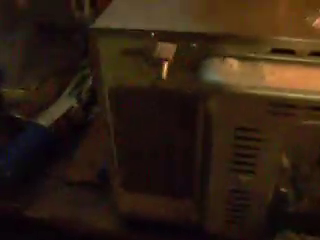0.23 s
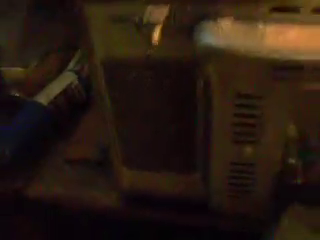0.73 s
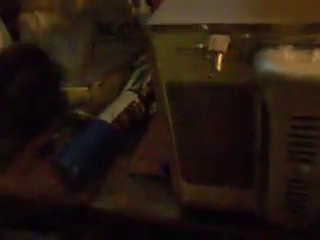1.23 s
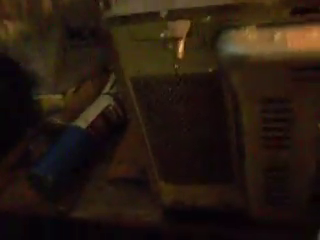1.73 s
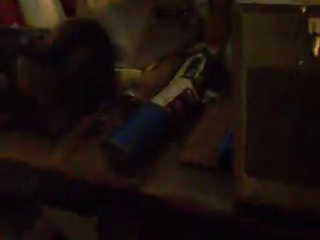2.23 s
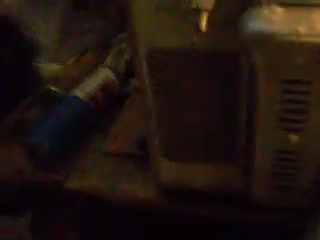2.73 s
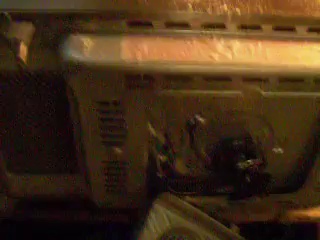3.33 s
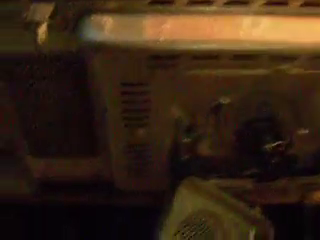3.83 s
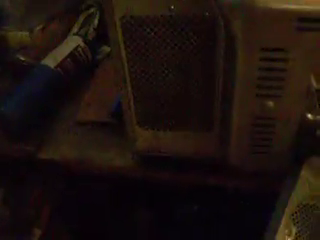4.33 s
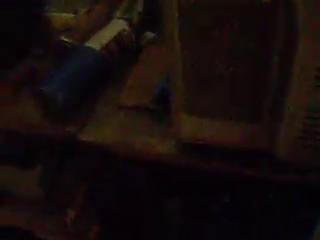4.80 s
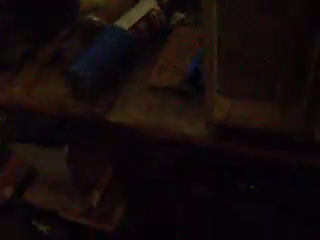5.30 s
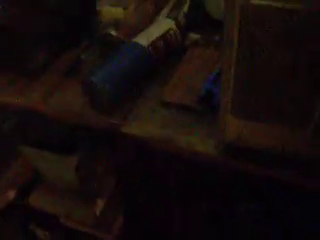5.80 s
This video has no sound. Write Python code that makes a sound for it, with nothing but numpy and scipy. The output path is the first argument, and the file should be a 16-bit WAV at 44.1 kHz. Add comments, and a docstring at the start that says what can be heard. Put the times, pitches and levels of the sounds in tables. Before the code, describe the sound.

A heavy hammer pounds a metal microwave oven on a workshop bench in a steady rhythm, roughly three blows every two seconds. Each hit is a harsh burst of crumpling sheet steel with a short clang and low thump; the case drops back, its loose panels rattle, and hard clinks ring out. The room echoes briefly over soft low background noise. The close, narrow-band microphone distorts and crackles on the blows.

```python
"""A sledgehammer smashes a microwave oven on a workshop bench, blow after blow in a steady rhythm.
Each blow is a shower of tiny contacts that makes the steel case ring, plus a clang and a low bench thump.
The case falls back and its panels rattle (more contacts); hard clinks and faint metal scrapes ring in the room.
Under it lies a soft background of filtered noise. A narrow-band microphone close by is overloaded by the blows."""
import sys
import numpy as np
from scipy import signal
from scipy.fft import rfft, irfft, next_fast_len
from scipy.io import wavfile

SR = 44100
rng = np.random.default_rng(int(sys.argv[2]) if len(sys.argv) > 2 else 0)


def bounce(signal):
    """Save signal as a 16-bit WAV file at the path given by the first command-line argument."""
    frames = np.transpose(np.atleast_2d(signal))
    limited = np.clip(frames, -1, 1)
    pcm = np.round(limited * 32767).astype(np.int16)
    wavfile.write(sys.argv[1], SR, pcm)


N = 266981  # length of the scene in samples

# Hammer blows, the first still dying away at the start: (time [s], energy [dB], crumpling time [s],
# bench thump [dB], fall-back [dB], first rattle [dB])
HAMMER_BLOWS = [(-.047, 34.5, 0.07, 13.5, 32.5, -0.5), (.5950, 43, .044, 22, 28, 8),
                (1.2502, 43, .036, 17.5, 23.5, 6.5), (1.9588, 44, .039, 21, 19.5, 16.5),
                (2.6039, 42.5, 0.061, 19.5, 20.5, 14.5), (3.2270, 42, .049, 23.5, 30, 13),
                (3.923, 42, 0.06, 13, 27.5, 4.5), (4.6469, 45, .028, 24.5, 17, 15.5),
                (5.3391, 41.5, 0.051, 20.5, 9, 10)]
# Single louder knocks as the case tips and the hammer is pulled free:
# (time [s], energy [dB], chatter time [s])
CASE_KNOCKS = [(.028, 29.5, 0.0083), (.878, 21, 0.036), (1.1067, 12, 0.019), (1.150, 12, .02),
               (1.498, 19.5, .016), (2.318, 21, 0.028), (2.466, 13, 0.002), (3.064, 21, 0.019),
               (3.150, 11, .012), (3.505, 19, 0.005), (3.788, 26, 0.0064), (4.3535, 17, .0015),
               (4.597, 4.5, .002), (4.894, 29, 0.01), (5.040, 12.5, 0.052), (5.2560, 27.5, .009),
               (5.9726, 21, 0.018)]
# Hard clinks, and faint metal scrapes as the hammer is pulled out:
# (time [s], energy [dB], chatter time [s], ring pitch [Hz], time to fall 60 dB [s])
METAL_CLINKS_AND_SCRAPES = [(0.417, 22.5, 0.0092, 3430, 0.015), (.424, 21, .032, 4100, 0.0067),
                            (1.063, 5, .035, 2234, .3), (1.902, -3, 0.09, 3200, 0.012),
                            (2.127, 25, 0.031, 3250, 0.033), (2.466, 22, .02, 3200, .03),
                            (3.060, 14.5, 0.0081, 3600, .015), (3.789, 22.5, 0.0059, 3420, 0.02),
                            (4.362, 11.5, 0.0038, 3170, .035), (4.597, -1.5, 0.015, 3210, 0.052),
                            (4.631, 4.5, .008, 3230, .06), (4.826, 20.5, 0.016, 3280, 0.035),
                            (5.257, 15.5, 0.003, 3650, .015), (5.790, 3.5, 0.066, 2700, 0.0061)]
# Long single tones of the steel case:
# (pitch before detuning [Hz], relative energy [dB], time to fall 60 dB [s])
CASE_MODES = [(155.4, -26, 0.93), (185.8, -21, 0.72), (209, -25, 0.98), (279.6, -29.5, 0.98), (409, -21, 1),
              (526.5, -20.5, 1), (595.7, -16, 0.59), (619, -17.5, 1), (668, -23, .6), (735, -30, 0.2),
              (823, -20, 0.78), (1060, -22.5, 0.3), (1340, -25.5, 0.52), (2234, -19.5, 0.36),
              (2806, -24.5, 0.15), (3200, -25, 0.98), (3440, -19, 0.6)]
# Tone colour of the dense ring of the dented panels: (frequency [Hz], relative level per Hz [dB])
PANEL_COLOUR = [(25, -19), (70, -11), (170, 1.5), (320, -2), (400, 0.5), (460, -4), (620, 4.5), (1000, 2),
                (1600, 0), (2600, 0.5), (4000, 4), (6000, -7.5)]
# How long the workshop echoes: (frequency [Hz], time to fall 60 dB [s])
ROOM_DECAY = [(60, 1.79), (170, 1), (400, 1), (900, 0.67), (2000, 0.62), (3400, 0.71), (5000, 0.42)]
# Tone colour of the room's background: (frequency [Hz], relative level per Hz [dB])
AIR_COLOUR = [(20, -1), (50, -5.5), (110, 22.5), (250, -1), (700, -11), (2000, -9.5), (5000, -25)]
# Microphone response, falling steeply above its narrow band: (frequency [Hz], gain [dB])
MIC_RESPONSE = [(20, -5.5), (2900, -1.5), (3150, -0.5), (3450, -0.5), (3720, -3.5), (3950, -21.5),
                (4300, -21), (4550, -28.5), (4900, -91.5)]
# Treble roll-off after the clipping: (frequency [Hz], gain [dB])
TREBLE_ROLLOFF = [(20, 0), (4500, 0), (5200, -2.5), (10300, -5), (12000, -4.3), (16000, -4.3)]

AIR_DB = -54  # background level before the microphone
EDGE_HZ = 16200  # top edge of the finished sound
RING_SIZE = 57344  # length of rings and echoes in samples
# each blow lifts the case, which drops back on the bench a moment later
FALL_BACK_S, FALL_CHATTER_S = .171, .015
# then its loose panels rattle, on average ever more softly
RATTLE_DELAY_S, RATTLE_GAP_S, RATTLE_CHATTER_S = .24, .045, 0.024
RATTLE_FADE_DB_PER_S, RATTLE_SPREAD_DB = 41.5, 4


def gain_of(db):
    """Turns decibels into an amplitude factor."""
    return 10 ** (np.asarray(db) / 20)


def unit(x):
    """Scales a sound to energy 1 (the sum of its squares)."""
    return x / np.sqrt(np.sum(x ** 2) + 1e-20)


def read(points, hz):
    """Reads between the points of a table, on a logarithmic frequency axis."""
    f, value = np.transpose(points)
    return np.interp(np.log(hz + 1), np.log(f + 1), value)


def coloured(x, points):
    """Makes each frequency louder or softer, following a (frequency [Hz], level [dB]) table."""
    size = next_fast_len(len(x) + 2048)
    gain = gain_of(read(points, np.fft.rfftfreq(size, 1 / SR)))
    return irfft(rfft(x, size) * gain, size)[:len(x)]


def dying(t, t60):
    """Amplitude that falls by 60 dB in t60 seconds."""
    return np.exp(-np.log(1000) * t / t60)


def add(mix, s, sound):
    """Adds a sound at time s; what lies outside the mix is lost."""
    start = round(s * SR)
    sound = sound[max(-start, 0):]
    part = mix[max(start, 0):][:len(sound)]
    part += sound[:len(part)]


def chatter(seconds, per_s, first):
    """Force of a contact: one sharp tick, then a dying shower of slips and rebounds, a few of them large."""
    t = np.arange(SR // 3) / SR
    size_db = 5 * np.minimum(rng.exponential(1, len(t)), 3)
    slips = rng.choice([-1, 1], len(t)) * gain_of(size_db)
    happens = rng.random(len(t)) < per_s / SR
    force = unit(slips * happens * np.exp(-t / max(seconds, 1e-3)))
    force[0] += first
    return unit(force)


def room_tail():
    """Dense reflections: noise that swells quickly, then dies at its own speed in each band."""
    hz, t, bands = signal.stft(rng.standard_normal(RING_SIZE), SR, nperseg=512)
    fade = dying(t, read(ROOM_DECAY, hz)[:, None])
    tail = signal.istft(bands * fade, SR, nperseg=512)[1][:RING_SIZE]
    swell = 1 - np.exp(-np.arange(RING_SIZE) / SR / 0.0024)
    return unit(tail * swell)


def case_ring(panel_t60, room_db, modes_db):
    """The case struck at one spot: a brief clash of panels, its long tones, and the room's answer."""
    t = np.arange(RING_SIZE) / SR
    clash = unit(rng.standard_normal(RING_SIZE) * dying(t, panel_t60))
    dense = unit(coloured(clash + gain_of(room_db) * room_tail(), PANEL_COLOUR))
    # dents detune the tones from spot to spot, so that they beat against each other
    detune_hz = 12
    modes = np.zeros(RING_SIZE)
    for hz, db, t60 in CASE_MODES:
        pitch = hz + detune_hz * rng.standard_normal()
        tone = unit(dying(t, t60) * np.sin(2 * np.pi * pitch * t))
        modes += gain_of(db) * tone * rng.choice([-1, 1])
    return dense + gain_of(modes_db) * modes


def shake_case(force, panel_t60, room_db, modes_db, count=3):
    """Every slip of the force lands on one of several spots of the case, each with its own ring."""
    spot = rng.integers(0, count, N)
    out = np.zeros(N)
    for k in range(count):
        ring = case_ring(panel_t60, room_db, modes_db)
        out += signal.oaconvolve(force * (spot == k), ring)[:N]
    return out


def air():
    """Low, steady background of the workshop: noise shaped by its tone colour."""
    return gain_of(AIR_DB) * np.sqrt(N) * unit(coloured(rng.standard_normal(N), AIR_COLOUR))


def clinks_and_scrapes():
    """Showers of contacts excite one main ring and a cluster of short tones nearby; the room carries them on."""
    out, t = np.zeros(N), np.arange(SR // 4) / SR
    for s, db, seconds, hz, t60 in METAL_CLINKS_AND_SCRAPES:
        ring = unit(np.sin(2 * np.pi * hz * t) * dying(t, t60))
        ratios = 1 + 0.14 * rng.standard_normal(16)
        cluster = sum(np.sin(2 * np.pi * hz * ratio * t) for ratio in ratios)
        ring = ring + gain_of(-4) * unit(cluster * dying(t, 0.033))
        contacts = chatter(seconds, per_s=1500, first=0.4)
        add(out, s, gain_of(db) * unit(signal.fftconvolve(contacts, ring)))
    return out + gain_of(-18.5) * signal.oaconvolve(out, room_tail())[:N]


def rocking(fall_db, rattle_db, count=9):
    """Force on the case after a blow: it falls back, then rattles at uneven intervals."""
    force = np.zeros(SR)
    add(force, FALL_BACK_S, gain_of(fall_db) * chatter(FALL_CHATTER_S, per_s=1100, first=.17))
    for k in range(count):
        after = RATTLE_GAP_S * (k + rng.random())
        db = rattle_db - RATTLE_FADE_DB_PER_S * after + RATTLE_SPREAD_DB * rng.standard_normal()
        rattle = chatter(RATTLE_CHATTER_S, per_s=900, first=0.14)
        add(force, RATTLE_DELAY_S + after, gain_of(db) * rattle)
    return force


def knocks():
    """The case falls back and loose panels chatter against it as it rocks, which makes it ring."""
    force = np.zeros(N)
    for s, _, _, _, fall_db, rattle_db in HAMMER_BLOWS:
        add(force, s, rocking(fall_db, rattle_db))
    for s, db, seconds in CASE_KNOCKS:
        add(force, s, gain_of(db) * chatter(seconds, per_s=1100, first=0.25))
    return shake_case(force, panel_t60=.09, room_db=-9.5, modes_db=-1.5)


def thump(t60, top_hz):
    """The heavy bench shudders under a blow: low, dying noise."""
    t = np.arange(RING_SIZE) / SR
    low_pass = signal.butter(2, top_hz, fs=SR, output="sos")
    shudder = signal.sosfilt(low_pass, rng.standard_normal(RING_SIZE))
    return unit(shudder * dying(t, t60))


def clang(hz, t60, seconds):
    """Steel on steel: the hard face of the hammer chatters with a short, shrill ring."""
    t = np.arange(SR // 8) / SR
    pitch = hz * (1 + .012 * rng.standard_normal())
    ring = np.sin(2 * np.pi * pitch * t) * dying(t, t60)
    return unit(signal.fftconvolve(chatter(seconds, per_s=2000, first=0.063), ring))


def hammer():
    """The head lands with a clang, the sheet metal buckles under it and the bench shudders."""
    out, force = np.zeros(N), np.zeros(N)
    clang_db = -6.5  # compared with the blow
    for s, db, seconds, thump_db, _, _ in HAMMER_BLOWS:
        add(force, s, gain_of(db) * chatter(seconds, per_s=700, first=0.32))
        add(out, s, gain_of(db + clang_db) * clang(hz=3430, t60=.012, seconds=seconds))
        # the bench answers 9.2 ms after the hit
        add(out, s + 0.0092, gain_of(thump_db) * thump(t60=0.34, top_hz=86))
    return out + shake_case(force, panel_t60=0.11, room_db=-3.0, modes_db=-3.5)


def scene():
    """All sources added together at the microphone."""
    return (air() + clinks_and_scrapes() + knocks() + hammer())[None]


def record(dry):
    """The capsule saturates, its narrow band runs into a hard clip, and the tallest peaks overflow."""
    capsule_limit, ceiling, overflow_share = 2.0, .71, .0005
    saturated = capsule_limit * np.tanh(dry[0] / capsule_limit)
    voiced = coloured(saturated, MIC_RESPONSE)
    clipped = coloured(np.clip(voiced, -ceiling, ceiling), TREBLE_ROLLOFF)
    # an overflowing peak flips its sign for at least two samples: a bright crackle
    overflows = abs(voiced) > np.quantile(abs(voiced), 1 - overflow_share)
    flipped = overflows | np.roll(overflows, 1)
    crackling = np.where(flipped, -clipped, clipped)
    low_pass = signal.firwin(201, EDGE_HZ, window=("kaiser", 8), fs=SR)
    return signal.oaconvolve(crackling, low_pass, "same")[None]


dry = scene()
out = record(dry)
bounce(out)
```